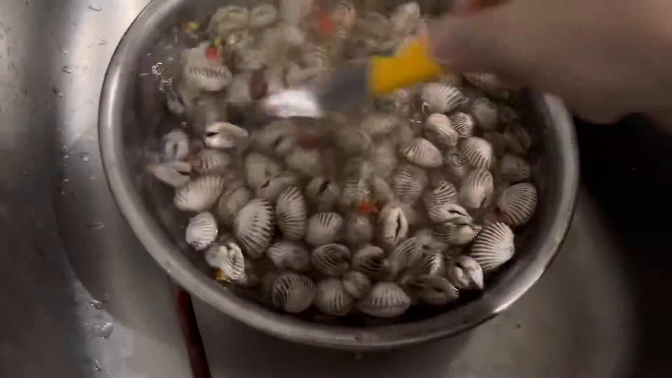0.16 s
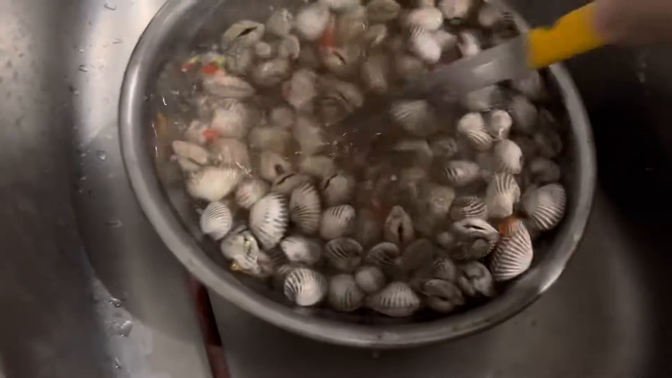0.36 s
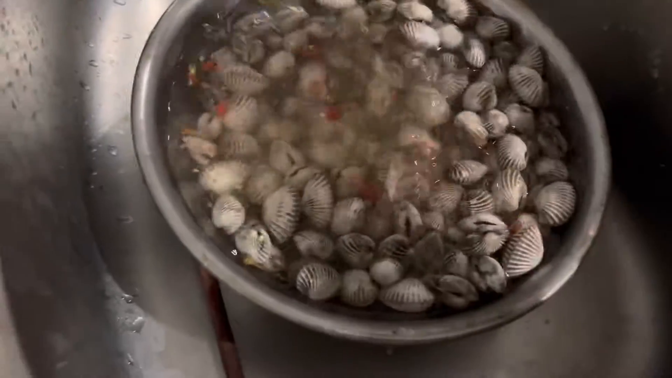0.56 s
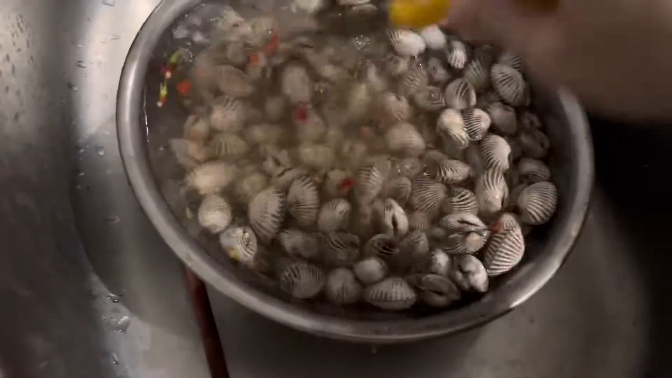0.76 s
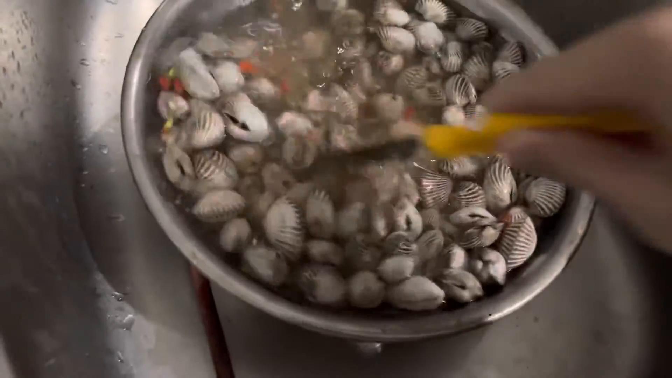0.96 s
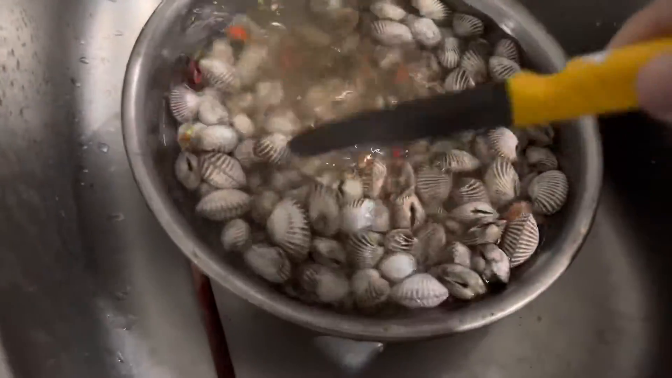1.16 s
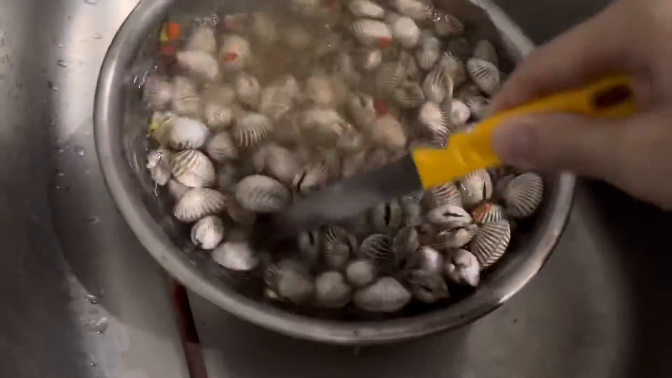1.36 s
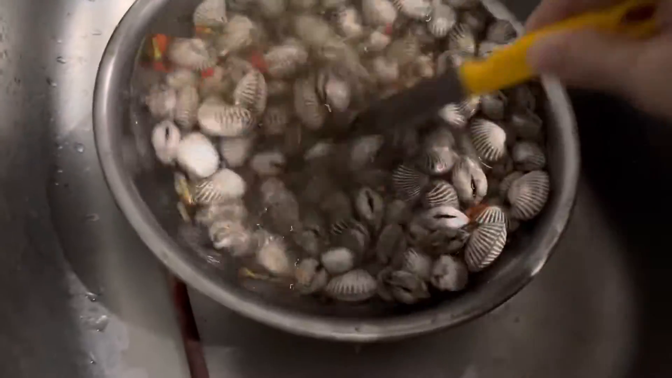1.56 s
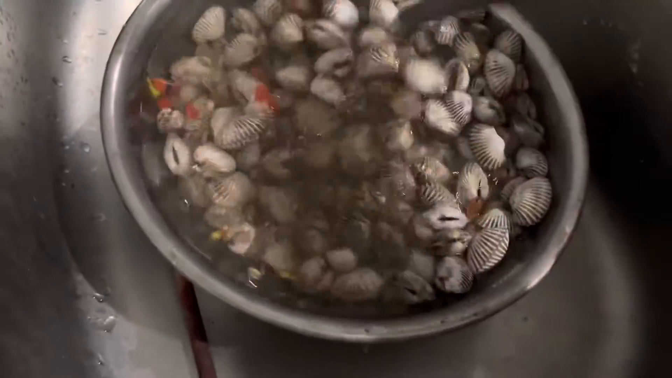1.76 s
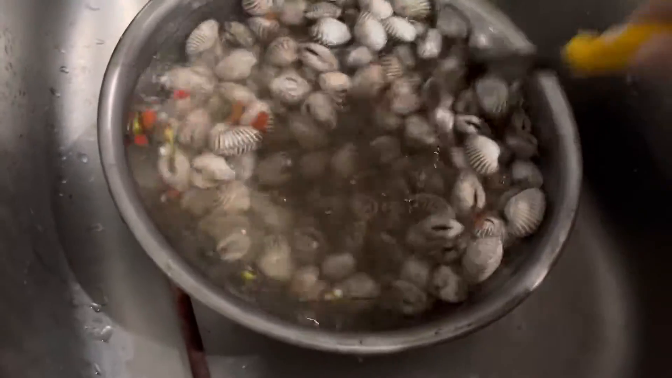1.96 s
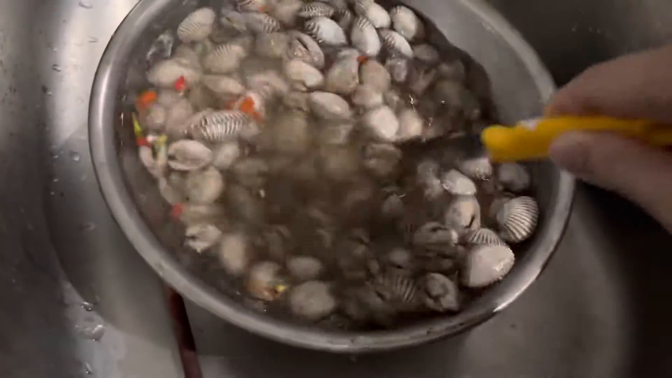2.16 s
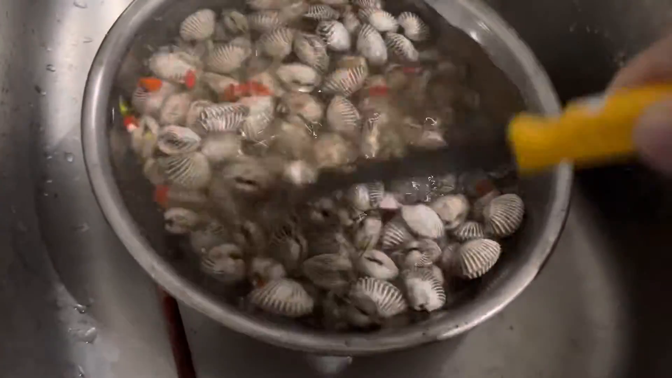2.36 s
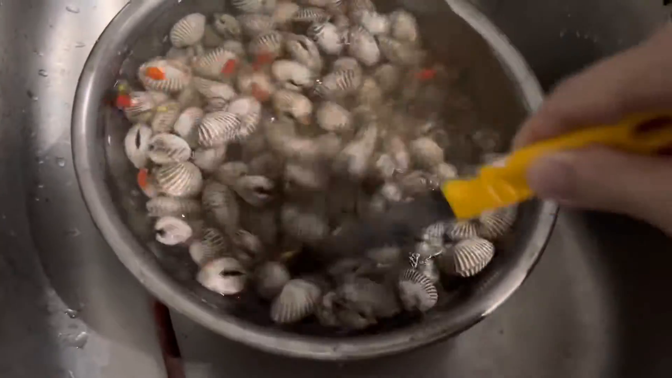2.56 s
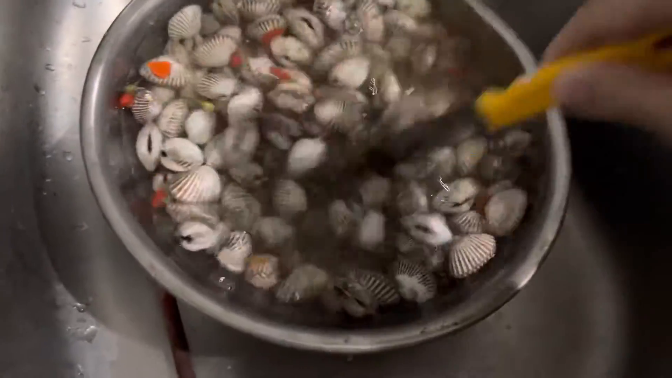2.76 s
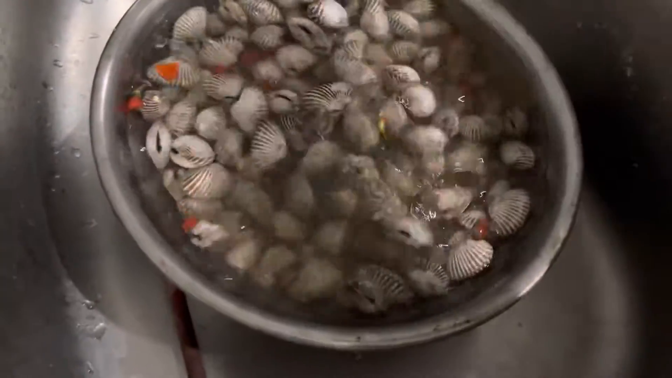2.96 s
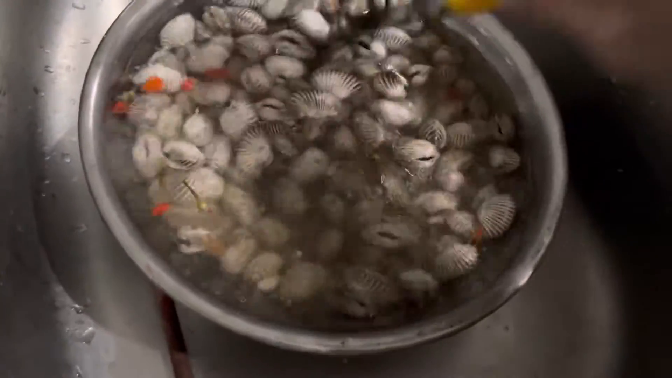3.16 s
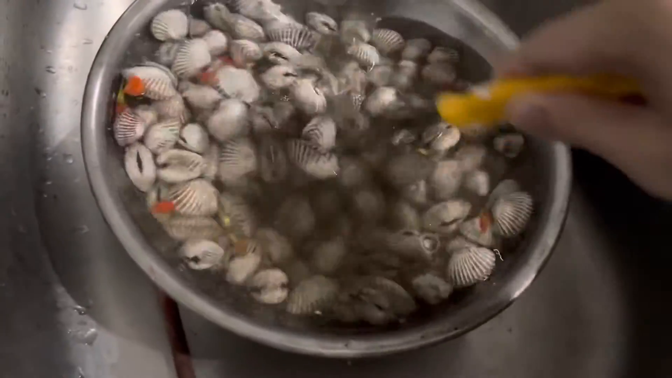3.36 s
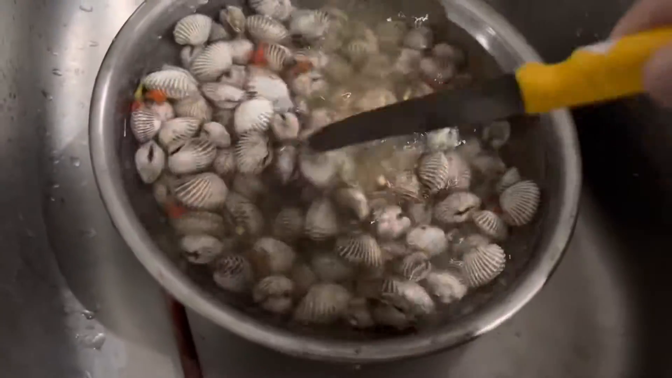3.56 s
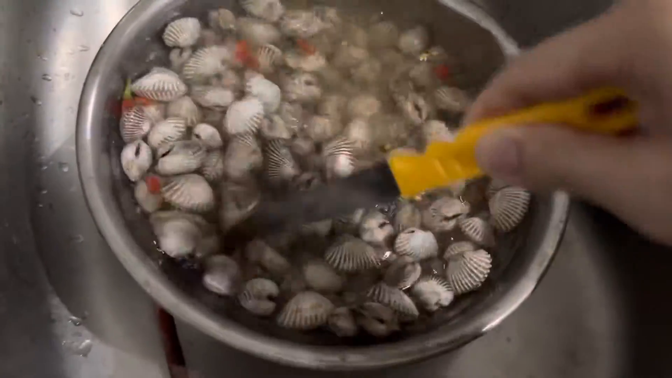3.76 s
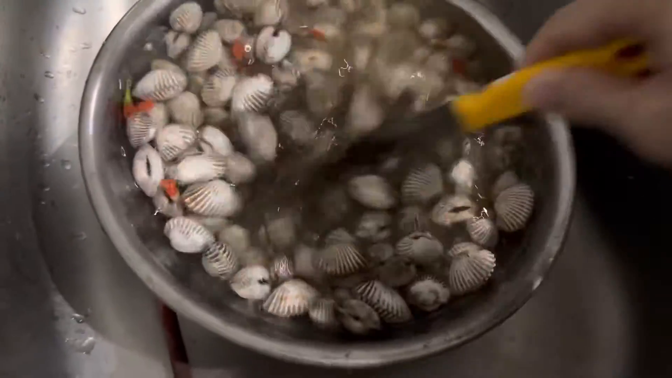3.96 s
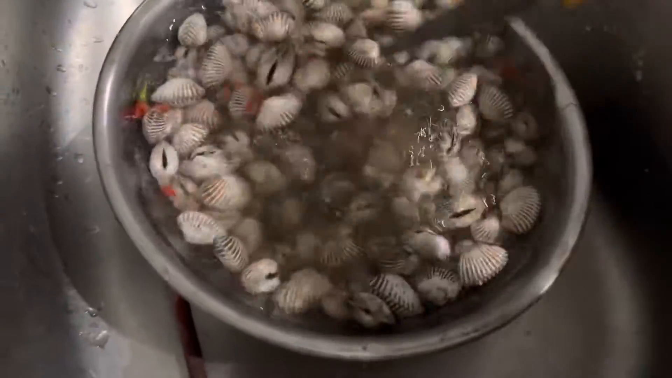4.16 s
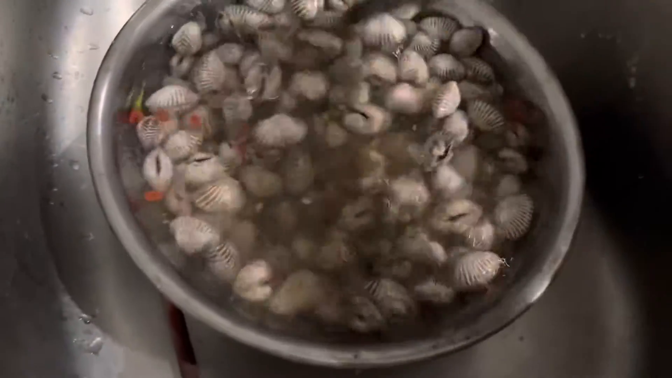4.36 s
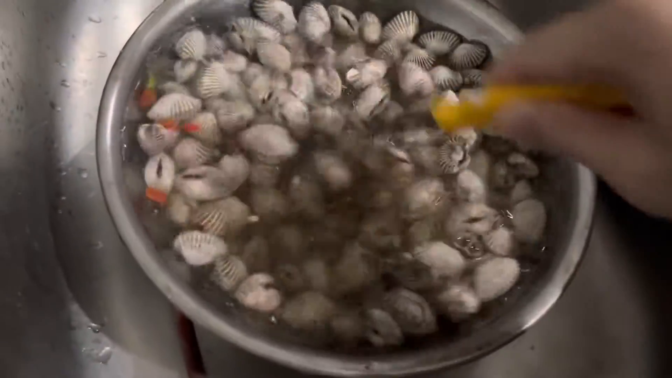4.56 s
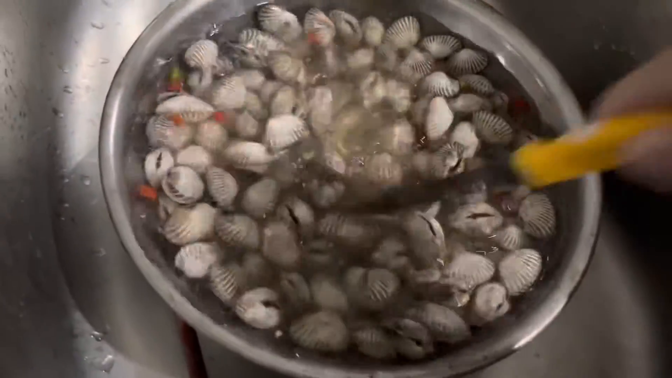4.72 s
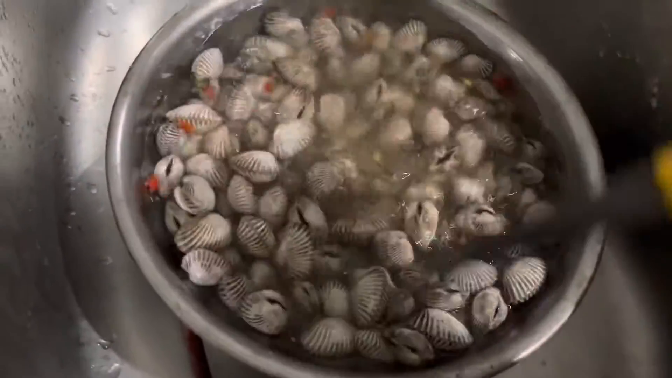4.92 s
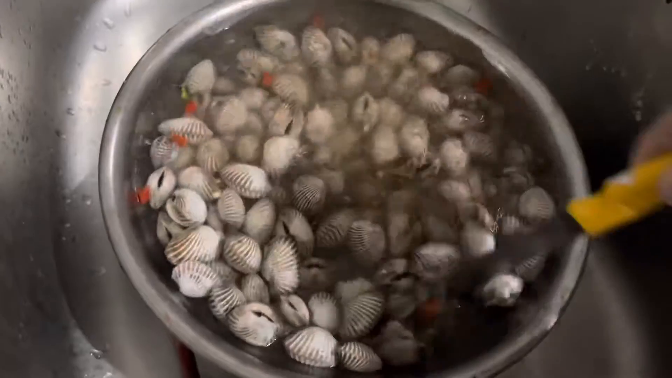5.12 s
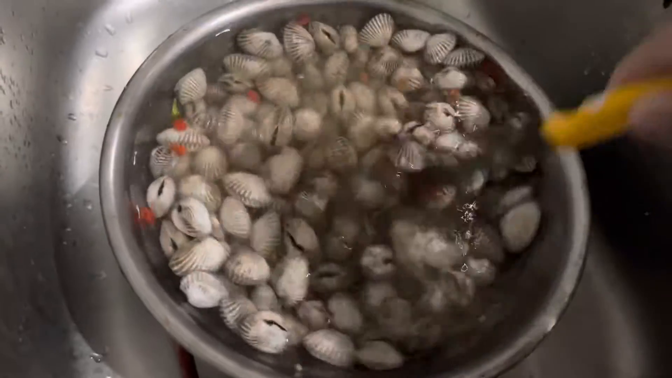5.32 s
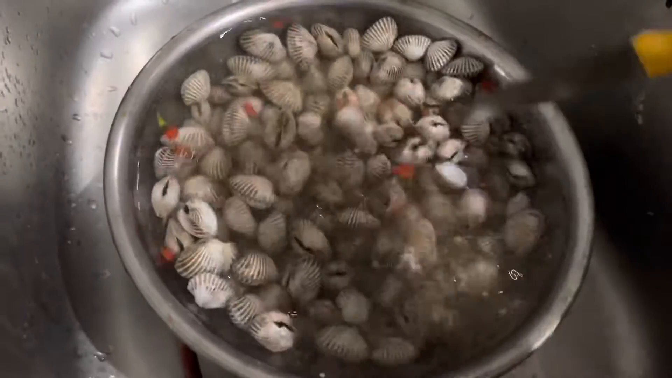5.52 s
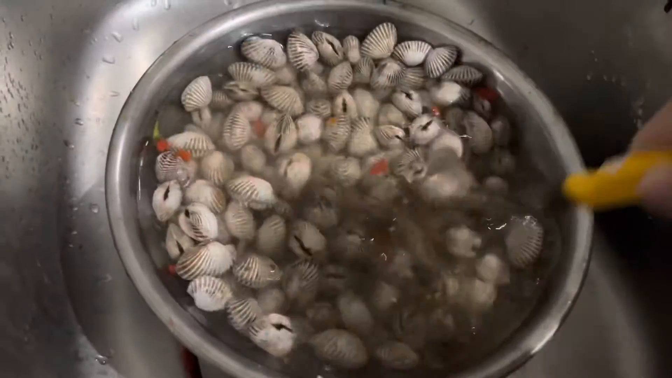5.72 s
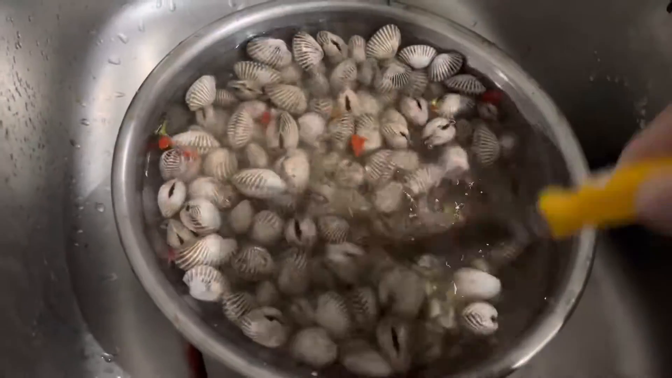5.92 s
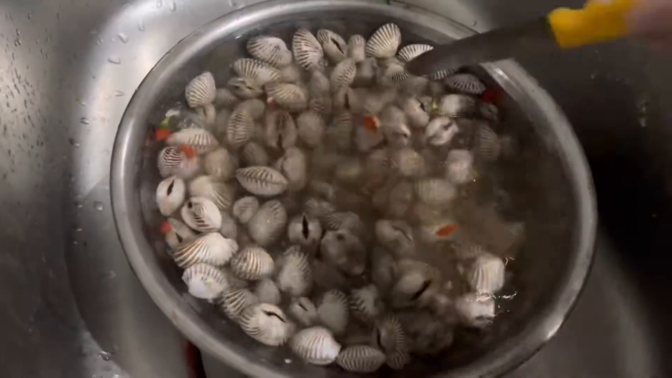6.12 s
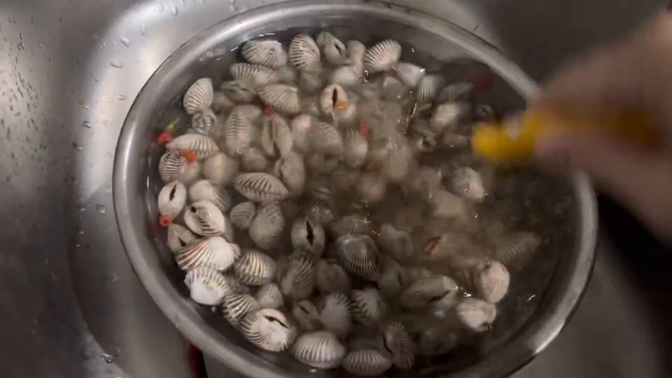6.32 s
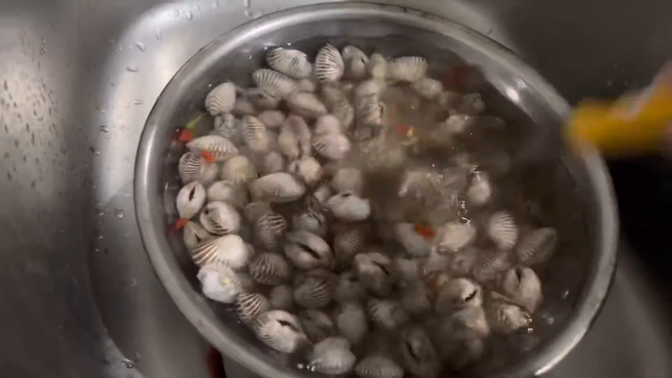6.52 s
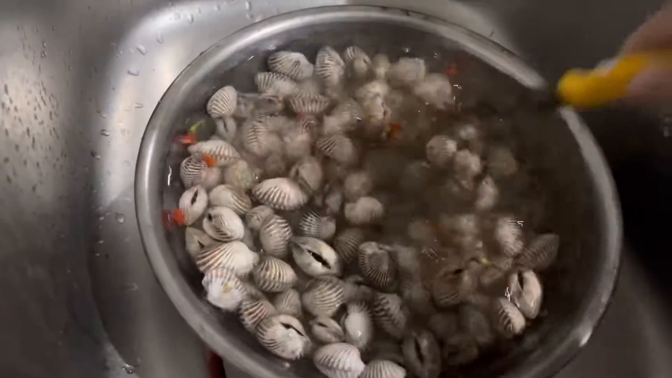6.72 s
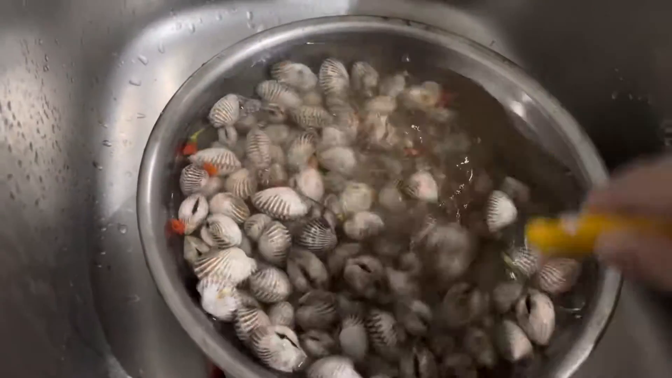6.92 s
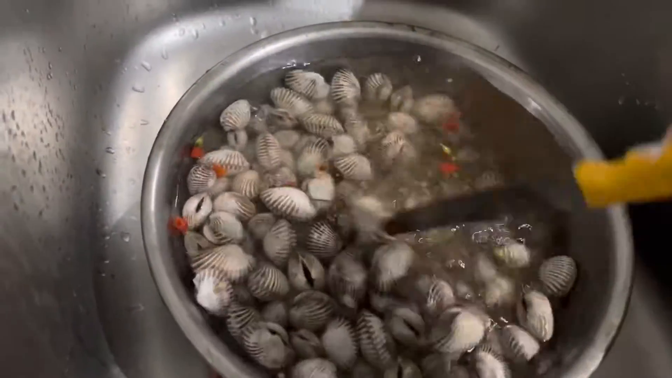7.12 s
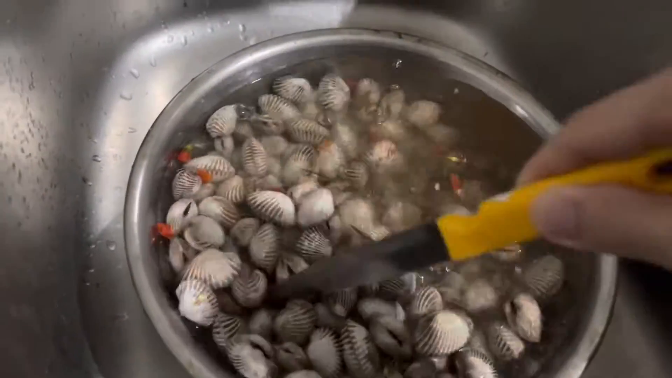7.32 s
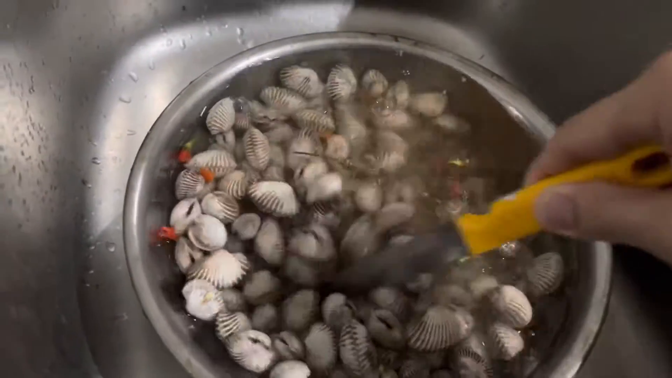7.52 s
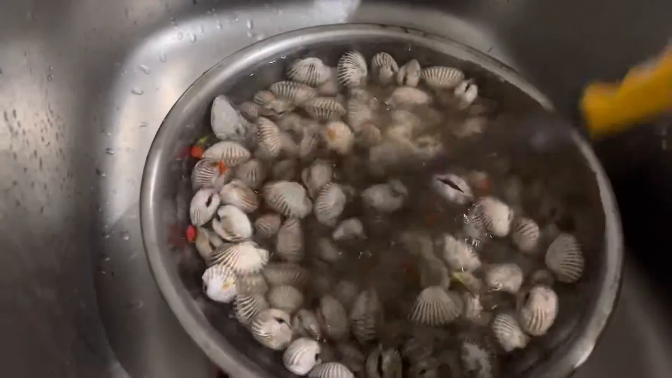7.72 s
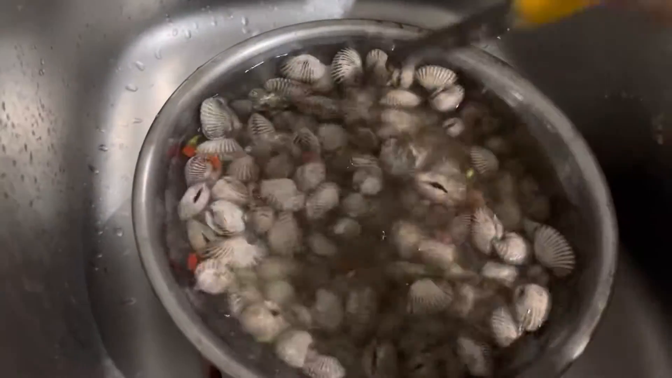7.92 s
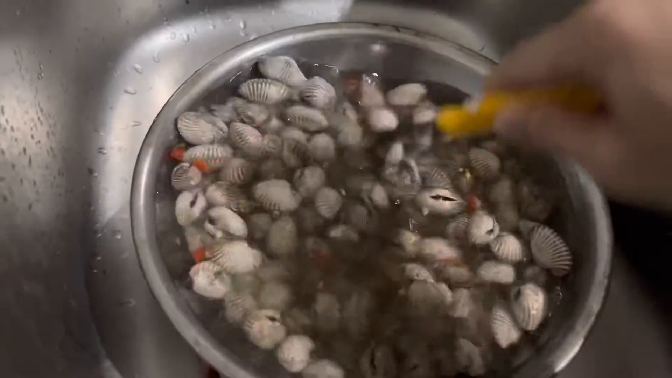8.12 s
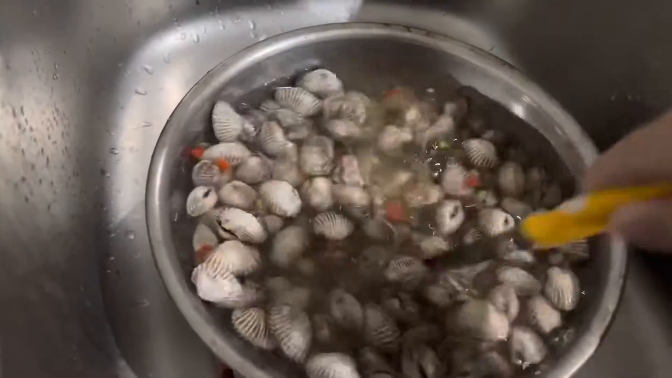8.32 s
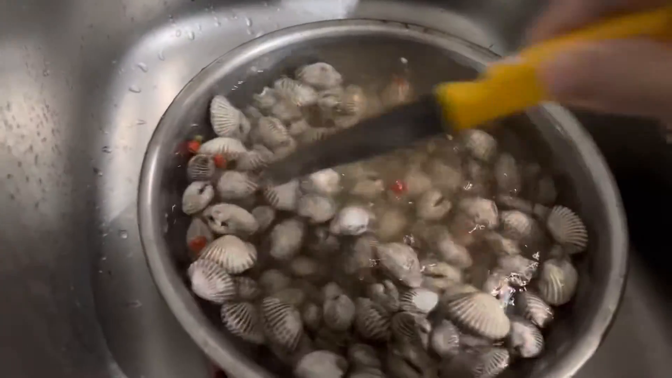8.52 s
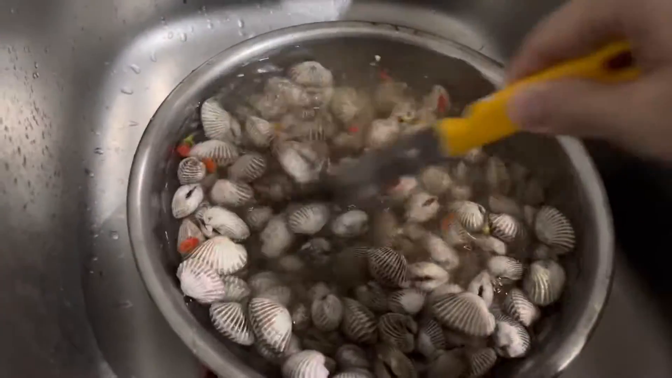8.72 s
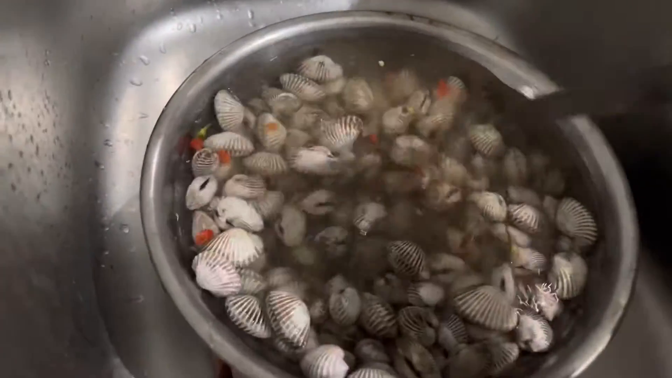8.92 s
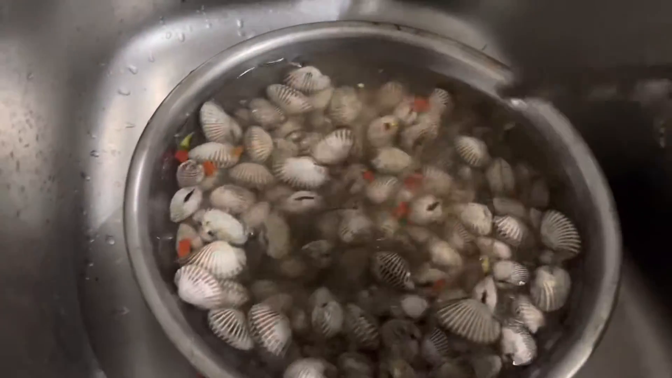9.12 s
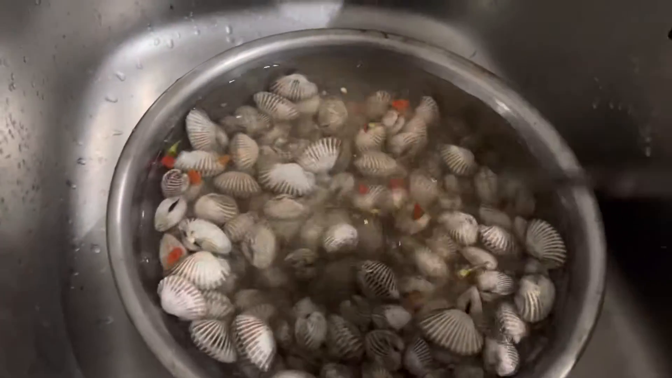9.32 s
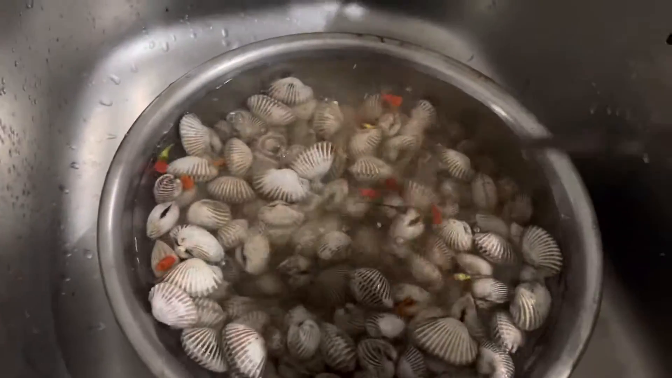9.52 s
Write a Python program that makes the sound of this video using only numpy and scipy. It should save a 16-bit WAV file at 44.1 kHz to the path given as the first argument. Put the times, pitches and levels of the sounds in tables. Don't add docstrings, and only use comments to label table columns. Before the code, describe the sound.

Close to a phone microphone in a small hard-walled kitchen, a knife stirs many small shells in a steel bowl of water set in a steel sink. The sound starts mid-stirring at 0 s with a sharp clack, then surges about every 0.6 s: blade strike, dense wet crunching rattle, dull water-damped bowl ring, brief fall. At 0.7 s a loud hollow gulp sags in pitch amid a heavy sink rumble. Strong strokes continue from 1.3 to 5 s, with ragged thuds on the bowl wall around 1.5, 4 and 4.6 s. The stroke near 5.7 s is somewhat lighter; then vigorous clattering returns from 6.2 s. At 8 s a low sink boom accompanies a hard stroke. A short, bright clatter at 8.6-8.8 s ends the stirring. After 9 s only tiny ticks remain over faint low hum and thin hiss.

```python
import sys
import numpy as np
from scipy import signal
from scipy.fft import rfft, irfft, next_fast_len
from scipy.io import wavfile
from scipy.ndimage import uniform_filter1d, map_coordinates

SR = 44100
rng = np.random.default_rng(int(sys.argv[2]) if len(sys.argv) > 2 else 0)


def waveform_to_disk(signal):
    frames = np.transpose(np.atleast_2d(signal))
    scaled = np.clip(frames, -1, 1) * 32767
    samples = np.round(scaled).astype(np.int16)
    wavfile.write(sys.argv[1], SR, samples)


def level_to_linear(level):
    exponent = np.asarray(level, float) / 20
    return 10 ** exponent


N = 426888

# (blade enters [s], build-up [s], hold [s], bowl ring on entry [dB], at full push [dB])
STROKE_TABLE = [(-0.5, .2, .02, -30, -24), (0.035, .24, .08, -30, -22), (0.71, .23, .03, -28, -22),
                (1.26, .215, .12, -28, -19.5), (1.931, .22, .05, -31, -23.5), (2.453, .21, .11, -37, -21.5),
                (3.09, .225, .11, -33, -19.5), (3.74, .22, .05, -28, -19), (4.373, .235, .02, -34, -20),
                (4.98, .2, .06, -37, -23.5), (5.645, .14, .21, -33, -28.5), (6.203, .12, .1, -32, -21),
                (6.75, .13, .09, -38, -19.5), (7.287, .3, .01, -34, -21), (7.976, .26, .03, -28, -19),
                (8.631, .065, .01, -35, -26), (8.93, .02, .08, -50, -50)]
# (time [s], peak [dB], pitch [Hz])
BLADE_STRIKES = [(0.0188, -19, 7840), (0.0516, -7, 3120), (0.6555, -18, 2870), (0.6973, -11, 2530),
                 (0.7166, -5, 2550), (1.2608, -12, 4330), (1.290, -10, 5000), (1.9302, -11, 7600),
                 (1.967, -18, 4300), (2.4542, -11.5, 2780), (2.4972, -20.5, 3840), (3.0895, -8.5, 2590),
                 (3.1192, -9, 3670), (3.167, -11, 4270), (3.7339, -14, 3800), (3.7594, -7.5, 2480),
                 (4.375, -8.5, 2950), (4.9773, -12, 6280), (5.013, -11, 8200), (5.1006, -13, 7200),
                 (5.646, -19.5, 3520), (6.2049, -7, 2990), (6.7447, -21, 3450), (6.7955, -6.5, 4580),
                 (7.2875, -12.5, 2920), (7.321, -17, 5240), (7.9826, -10.5, 4200), (8.017, -18, 3440),
                 (8.6312, -14, 7100), (8.6792, -12, 8400)]
# (time [s], peak [dB])
SINK_LURCHES = [(0.029, -36), (0.069, -28), (0.119, -26), (0.359, -30), (0.717, -23), (0.789, -20),
                (1.293, -31), (1.939, -32), (2.669, -34), (3.124, -24), (3.169, -26), (3.759, -27),
                (3.819, -25), (4.382, -28), (4.989, -41), (5.049, -37), (5.659, -31), (5.786, -29),
                (6.225, -23), (6.289, -27), (7.3, -31), (7.329, -31), (7.399, -29), (7.989, -17),
                (8.029, -19), (8.239, -30), (8.679, -40)]
# (frequency [Hz], width [Hz], level [dB])
BOWL_MODES = [(220, 22, -7.5), (312.5, 23, -2), (419.4, 55, -3), (483.5, 47, 0), (538, 32, 3),
              (681, 50, -5), (766, 40, -4.5), (856, 52, -3.5), (995, 56, -0.5), (1069, 120, -5),
              (1205, 110, -6), (1307, 120, -8.5), (1465, 53, -5), (1678, 57, -3), (1830, 99, -9.5),
              (2120, 250, -15.5), (2570, 120, -11), (2930, 150, -11.5), (3980, 170, -22)]
# (frequency [Hz], width [Hz], level [dB])
SINK_MODES = [(65, 13, 1), (105, 23, -3.5), (138, 42, -5)]
# (frequency [Hz], density [dB per Hz])
SHELL_SPECTRUM = [(300, -36), (900, -20), (1900, -9.5), (3000, -4.5), (4400, -2.5), (6000, -6), (8500, -4),
                  (10000, -7.5), (12000, -9), (15500, -17.5), (16500, -56)]


def unit(x):
    return x / np.sqrt(np.mean(x ** 2) + 1e-20)


def along(points, hz):
    f, v = np.transpose(points)
    return np.interp(np.log(hz + 1), np.log(f + 1), v)


def wobble(rate_hz):
    step = 16
    knots = rng.standard_normal(int(N * 400 / SR) + 9)
    curve = map_coordinates(knots, [np.arange(0, N, step) * min(rate_hz, 399) / SR])
    return np.repeat(curve, step)[:N]


def filtered(x, response):
    m = next_fast_len(N + SR // 2)
    return irfft(rfft(x, m) * response(np.fft.rfftfreq(m, 1 / SR)), m)[..., :N]


def modes(table):
    def response(f):
        total = 0
        for k, (centre, width, db) in enumerate(table):
            band = 1j * f * width
            total = total + (-1) ** k * level_to_linear(db) * band / (centre * centre - f * f + band)
        return total
    return response


def sink_response(low_cut_hz):
    return lambda hz: modes(SINK_MODES)(hz) * hz ** 4 / (hz ** 4 + low_cut_hz ** 4)


def shell_colour(gain_db=0):
    return lambda hz: level_to_linear(along(SHELL_SPECTRUM, hz) + gain_db)


def high_shelf(hz, order):
    return lambda f: 1 / (1 + (hz / (f + 1)) ** order)


def contacts(per_second, spread_db):
    count, hits = int(per_second * N / SR), np.zeros((2, N))
    size = level_to_linear(spread_db * np.minimum(rng.exponential(1, count), 3))
    hits[:, rng.integers(0, N, count)] = size * rng.standard_normal((2, count))
    return hits


def kitchen():
    # (frequency [Hz], density [dB per Hz])
    hum_spectrum = [(15, -43.5), (27, -28), (42, -6), (82, -10.5), (99, -11), (137, -16), (212, -34.5),
                    (607, -47), (2480, -49.5), (4740, -60.5), (7110, -43), (10100, -87), (16000, -115)]
    # (frequency [Hz], width [Hz], level [dB])
    hiss_modes = [(2400, 900, -8.5), (6400, 900, -2), (7150, 250, 3.5)]
    hum = unit(filtered(rng.standard_normal((2, N)), lambda hz: level_to_linear(along(hum_spectrum, hz))))
    hiss = unit(filtered(rng.standard_normal((2, N)), lambda hz: modes(hiss_modes)(hz) ** 2))
    return level_to_linear(-54.5) * hum + level_to_linear(-71) * hiss


def settle(rise_s, hold_s):
    return 53 + 3.2 / (rise_s + hold_s)


def ring_level(t):
    entry_s, touch_db, sag_db_per_s, still_db = .035, -8, 20, -77
    power = level_to_linear(2 * still_db)
    for s, rise, hold, entry_db, full_db in STROKE_TABLE:
        times = s + np.cumsum([0, min(entry_s, rise / 2), max(rise - entry_s, rise / 2), hold, 1])
        held_db = full_db - sag_db_per_s * hold
        levels = [entry_db + touch_db, entry_db, full_db, held_db, held_db - settle(rise, hold)]
        power = power + level_to_linear(2 * np.interp(t, times, levels, -120, -120))
    return 10 * np.log10(power)


def stroke_levels():
    # (time [s], shell rattle [dB], time to lose 20 dB [s], sharpness [dB])
    digs = [(0.019, -37, 3, -12), (0.075, -25.5, 1.6, -10), (0.48, -43, .4, -24), (0.655, -30, .03, -11),
            (0.715, -25, 1.2, -10), (1.26, -37, .1, -3), (1.287, -29, .4, -10), (1.931, -25, 1.2, -11),
            (2.453, -32, .15, -10), (2.525, -26, .8, -10), (2.9, -34, .5, -10), (3.09, -36, .1, -2),
            (3.125, -28, .25, -10), (3.62, -56, .9, 0), (3.76, -22, .1, -11), (4.2, -41, .4, -12),
            (4.373, -29, .6, -11), (4.977, -40, .6, -11), (5.055, -24, .9, -15), (5.44, -45, .7, -11),
            (5.646, -28, 1.1, -13), (6.0, -41, .35, -24), (6.203, -29, .1, -8), (6.26, -26, .7, -9),
            (6.744, -32, .3, -12), (6.795, -30, .4, -11), (7.318, -31, .3, -13), (7.982, -23, .1, -11),
            (8.03, -26, .8, -11), (8.631, -35, .7, -4)]
    rattle_db, rattle_grows, shake_db, shake_grows = -23.5, 1.35, -41.5, .55
    sharp_db, sharp_grows = -10, .45
    dry_db, dry_s = 9, .025
    slide_s = .035
    sink_rest_db, lurch_hum_db = -52, -9
    step = 16
    t = np.arange(0, N + step, step) / SR
    bowl_db = ring_level(t)
    over_db = bowl_db + 20
    rattle = level_to_linear(2 * (rattle_db + rattle_grows * over_db))
    edge = rattle * level_to_linear(2 * (sharp_db + sharp_grows * over_db))
    sink = level_to_linear(2 * (shake_db + shake_grows * over_db)) + level_to_linear(2 * sink_rest_db)
    for s, dig_db, fall_s, dig_sharp_db in digs:
        rise, hold, stop = next((b, h, a + b + h) for a, b, h, *_ in STROKE_TABLE if a + b + h > s)
        since = np.maximum(t - s, 0)
        struck = min(abs(s - row[0]) for row in BLADE_STRIKES) < .009
        swell = 1 if struck else np.minimum(since / slide_s, 1) ** 2
        rest_db = rattle_grows * settle(rise, hold) * np.maximum(t - stop, 0)
        burst = (t >= s) * swell * level_to_linear(2 * (dig_db - 20 * since / fall_s - rest_db))
        rattle = rattle + burst
        edge = edge + burst * level_to_linear(2 * (dig_sharp_db + dry_db * np.exp(-since / dry_s)))
    for s, db in SINK_LURCHES:
        sink = sink + (t >= s) * level_to_linear(2 * (db + lurch_hum_db - 130 * np.maximum(t - s, 0)))
    levels = 10 * np.log10(rattle), bowl_db, 10 * np.log10(sink), 10 * np.log10(edge / rattle)
    return [np.repeat(level, step)[:N] for level in levels]


def patchy(x, depth_db):
    z = signal.stft(x, nperseg=256)[2]
    field = uniform_filter1d(rng.standard_normal(z.shape[1:]), size=7, axis=0)
    field = uniform_filter1d(field, size=8, axis=1)
    return signal.istft(z * level_to_linear(depth_db * unit(field)), nperseg=256)[1][:, :N]


def rattle(clumps, sharp_db):
    count, t = 22000, np.arange(130) / SR
    when, pitch, size, life = rng.random((count, 4)).T[..., None]
    hz = 1700 + 8500 * pitch
    decay_db = -60 * t * hz / (10 + 30 * life)
    click = level_to_linear(-1.8 * np.log(size + .08) + decay_db) * np.sin(2 * np.pi * hz * t)
    at = (when * N + np.arange(len(t))).astype(int).ravel()
    sides = rng.uniform(-1, 1, (2, count, 1))
    clicks = np.array([np.bincount(at, (side * click).ravel(), N)[:N] for side in sides])
    t = np.arange(SR // 40) / SR
    scrape = rng.standard_normal((2, len(t))) * level_to_linear(-60 * t / 0.014)
    grit = signal.oaconvolve(contacts(1500, spread_db=2.2), scrape, axes=1)[:, :N]
    heap = 0.65 * unit(clicks) + 0.6 * unit(grit) + 0.85 * rng.standard_normal((2, N))
    heap = unit(clumps * filtered(patchy(heap, depth_db=2.0), shell_colour()))
    edge = filtered(heap, high_shelf(7500, 8))
    return heap + (level_to_linear(sharp_db + 6.5) - 1) * edge


def stirring():
    # (time [s], level [dB])
    upper = [(0.3, -0.5), (0.95, 2), (1.5, 0), (2.15, 1), (2.7, 0), (3.35, 0), (3.97, 0), (4.6, 0),
             (5.2, 0), (5.85, 0), (6.37, 0), (6.93, 0), (7.57, 2), (8.25, 0.5), (8.7, 0), (8.95, -4)]
    rattle_db, bowl_db, sink_db, sharp_db = stroke_levels()
    surge = 1.1 * wobble(25) + 0.81 * wobble(60)
    push = unit(contacts(1500, spread_db=2.0)) + 0.81 * rng.standard_normal((2, N))
    drive = level_to_linear(0.36 * surge + 0.73 * wobble(35) + 0.9 * wobble(12)) * push
    bowl = unit(filtered(drive, modes(BOWL_MODES)))
    rim = filtered(bowl, high_shelf(800, 4))
    rim_db = 0.34 * (bowl_db + 28.5) + np.interp(np.arange(N) / SR, *np.transpose(upper))
    bowl = bowl + (level_to_linear(rim_db) - 1) * rim
    sink = unit(filtered(level_to_linear(0.84 * wobble(19)) * rng.standard_normal((2, N)), sink_response(40)))
    shells = rattle(level_to_linear(surge + 1.1 * wobble(150)), sharp_db)
    return level_to_linear(rattle_db + 1.72) * shells + level_to_linear(bowl_db + 1.54) * bowl + level_to_linear(sink_db + 1.2) * sink


def knocks():
    # (time [s], peak [dB], pitch [Hz], bowl blow [dB])
    clacks = [(0.1244, -9, 4300, -22), (2.47, -21, 2900, -20), (2.599, -7.5, 4550, -9),
              (2.807, -15.5, 3000, -8), (4.145, -14, 2530, 4), (4.4784, -14.5, 2920, 1),
              (4.572, -9, 4800, -3), (4.6701, -2.5, 2900, -5), (5.0619, -24, 7170, -5),
              (5.0855, -18.5, 2570, -15), (5.3312, -9, 4420, -11), (5.8484, -8, 3750, -6),
              (6.264, -11, 4250, -10), (6.2947, -6, 2800, -11), (6.3583, -5, 5050, 6),
              (6.9835, -5, 4020, -4), (7.5364, -9, 2260, -13), (8.6647, -28, 2870, -15.5),
              (8.7255, -11.5, 7640, -0.5), (8.7444, -16.5, 5630, -17)]
    # (time [s], peak [dB], pitch [Hz], bowl blow [dB])
    settling = [(0.5486, -22, 3130, 0), (0.6, -20, 3260, -6), (2.9527, -17, 2020, 2),
                (3.0294, -30, 4360, -20), (3.068, -28, 3000, -17), (3.533, -31, 2900, -7),
                (4.1081, -24.5, 3890, -6), (4.3155, -16, 2980, -3), (5.4468, -20, 2880, 5),
                (5.4959, -22, 3800, 3), (6.0247, -17, 2710, -15), (6.117, -23, 4500, -5),
                (6.17, -30, 8450, 8), (6.7062, -28, 3030, -3), (7.2115, -19.5, 7950, -4),
                (7.7932, -15, 2060, 2), (7.9214, -28, 5200, -8), (8.7644, -24.5, 2860, -20),
                (8.9341, -30, 2980, 6), (9.2665, -54, 4800, 17), (1.135, -30, 3000, 8), (4.2, -26, 3500, 0),
                (6.58, -26, 3000, 2)]
    blade_blow_db, soft_hz = -11, 750
    crack, ring, blows = np.zeros((2, N + SR)), np.zeros((2, N + SR)), np.zeros((2, N))
    t = np.arange(SR // 12) / SR
    rise = 1 - np.exp(-t * 4000)
    strikes = [(*row, blade_blow_db) for row in BLADE_STRIKES]
    for s, db, hz, blow_db in [*strikes, *clacks, *settling]:
        at = round(s * SR)
        span = slice(at, at + len(t))
        luck = rise * rng.standard_normal((3, 2, len(t)))
        crack[:, span] += level_to_linear(db - 9) * (level_to_linear(-60 * t / .008) + .5 * level_to_linear(-60 * t / 0.039)) * luck[0]
        shell = signal.iirpeak(hz, 2.2, SR)
        ring[:, span] += signal.lfilter(*shell, level_to_linear(db - 4 - 60 * t / 0.035) * luck[1])
        blows[:, span] += level_to_linear(db + blow_db + 7.5 - 60 * t / .03) * luck[2]
    soft = level_to_linear(5) * signal.lfilter(*signal.butter(2, soft_hz, fs=SR), blows)
    bowl = filtered(soft + thuds(), modes(BOWL_MODES))
    return filtered(crack[:, :N], shell_colour(4)) + ring[:, :N] + bowl


def echoes(x):
    # (frequency [Hz], t60 [s])
    room_t60 = [(200, 0.24), (2000, 0.36), (9000, 0.05)]
    hz, t, z = signal.stft(rng.standard_normal((2, SR // 3)), SR, nperseg=256)
    fade = level_to_linear(-60 * t / along(room_t60, hz)[:, None])
    tail = signal.istft(z * fade, SR, nperseg=256)[1]
    late = np.pad(x, ((0, 0), (200, 0)))
    return signal.fftconvolve(late, tail / np.linalg.norm(tail[0]), axes=1)[:, :N]


def lurches():
    push_s = .007
    t, out = np.arange(N) / SR, np.zeros((2, N))
    push = np.sin(np.pi * np.minimum(t / push_s, 1))
    boom = filtered(push, sink_response(36))[:SR // 3]
    for s, db in SINK_LURCHES:
        out[0, round(s * SR):][:len(boom)] += level_to_linear(db + .5) * boom / abs(boom).max()
    return out


def pings():
    # (time [s], peak [dB], pitch [Hz], t60 [s])
    edge_hits = [(0.1052, -17, 3010, .012), (0.1371, -11, 4260, .012), (0.222, -17, 6500, .01),
                 (0.408, -21, 7000, .01), (1.4391, -15, 2900, .012), (2.5571, -19, 3910, .015),
                 (3.2266, -19, 3520, .012), (3.8806, -19, 3800, .012), (5.1003, -9, 7200, .02),
                 (5.178, -15, 5000, .015), (5.7164, -20, 3340, .012), (6.8853, -15, 2990, .012),
                 (6.9292, -14, 2830, .012), (7.3417, -20, 2580, .012), (8.0835, -14, 4140, .012),
                 (8.6787, -7, 7500, .006), (8.692, -15, 7000, .01), (8.7435, -14, 6000, .006),
                 (8.764, -20, 6000, .01), (8.787, -24, 6500, .01), (8.936, -27, 600, .07),
                 (9.07, -57, 5000, .006), (9.1805, -52, 3700, .014), (9.2665, -46, 5000, .007),
                 (9.2775, -50, 3900, .008), (9.3028, -51, 3200, .012), (9.419, -52, 3300, .02)]
    out, t = np.zeros((2, N + SR)), np.arange(SR // 20) / SR
    for s, db, hz, t60 in edge_hits:
        size, detune = rng.standard_normal((2, 2, 9, 1))
        partials = size * np.sin(2 * np.pi * hz * np.exp(0.21 * detune[0]) * t)
        ring = level_to_linear(-60 * t / t60) * np.sum(partials, axis=1)
        out[:, round(s * SR):][:, :len(t)] += level_to_linear(db) * ring / abs(ring).max()
    return out[:, :N]


def thuds():
    # (time [s], peak [dB])
    wall_hits = [(0.296, 2), (0.838, -11), (0.922, -4), (1.342, -11.5), (1.4, -6.5), (1.479, 1.5),
                 (1.938, -6), (2.75, -11), (3.317, -3), (3.402, -9.5), (3.758, -13.5), (3.87, -13),
                 (3.892, -9.5), (3.938, -8), (3.961, 3), (4.583, 1), (4.606, -0.5), (5.79, -5),
                 (6.302, -12), (6.366, -8), (6.885, -9.5), (6.926, -3.5), (6.981, -3.5), (7.528, -3),
                 (7.565, 1), (7.983, -10), (8.222, -14), (8.243, -10), (8.266, -5.5), (8.319, -5),
                 (0.232, -8), (2.012, -12), (3.262, -10), (3.823, -10), (4.033, -8), (5.129, -10),
                 (5.17, -6), (7.076, -12), (7.469, -11), (8.084, -8), (8.16, -8), (8.184, -6), (8.397, -12),
                 (8.694, -12), (2.15, -8), (2.215, -8), (6.335, -6), (6.41, -8), (2.6, -8), (2.7, -8)]
    blows, t = np.zeros((2, N + SR)), np.arange(SR // 20) / SR
    rise = 1 - np.exp(-t / 0.0051)
    for s, db in wall_hits:
        push = level_to_linear(db + 7 - 60 * t / 0.049) * rise * rng.standard_normal((2, len(t)))
        blows[:, round(s * SR):][:, :len(t)] += push
    return blows[:, :N]


def gulps():
    # (time [s], peak [dB], pitch [Hz])
    pockets = [
        (0.713, -8, 423),
        (6.234, -26, 431),
    ]
    out, t = np.zeros((2, N + SR)), np.arange(SR // 6) / SR
    sag = np.cumsum(.72 + 0.4 * np.exp(-t / 0.036)) / SR
    flutter_db = 4 * wobble(90)[:len(t)]
    fade = level_to_linear(-60 * t / 0.07) + 0.22 * level_to_linear(-60 * t / 0.7)
    rise = 1 - np.exp(-t / 0.007)
    for s, db, hz in pockets:
        tone = np.sin(2 * np.pi * hz * sag)
        out[0, round(s * SR):][:len(t)] += level_to_linear(db + flutter_db) * fade * rise * tone
    return out[:, :N]


def scene():
    hits = knocks() + gulps()
    return stirring() + pings() + hits + level_to_linear(-4.5) * echoes(hits) + lurches() + kitchen()


def sudden(x, jump_db):
    power = np.add.reduceat(np.diff(x) ** 2, np.arange(0, N - 1, 128)) + 1e-12
    leap = power[6:] / uniform_filter1d(power, size=6)[2:-4] > level_to_linear(2 * jump_db)
    return np.add.reduceat(np.pad(leap, (10, 16)), np.arange(0, len(leap) + 18, 8)) > 0


def thinned(ports, weaker_db, masked_db, ragged_db):
    halves = np.array([ports[0] + ports[1], ports[0] - ports[1]]) / 2
    hz, _, z = signal.stft(halves, SR, "cosine", 2048, 1024)
    bands = np.add.reduceat(abs(z) ** 2, np.arange(0, len(hz), 16), axis=1)
    power = np.repeat(bands, 16, axis=1)[:, :len(hz)]
    body = power[0, (hz > 1000) & (hz < 8000)].mean(axis=0)
    mood_db = np.repeat(ragged_db * rng.standard_normal(bands.shape), 16, axis=1)[:, :len(hz)]
    strong = power > level_to_linear(2 * (weaker_db + mood_db)) * power.sum(axis=0)
    audible = power > level_to_linear(2 * (masked_db + mood_db)) * body
    low = (hz < 8300)[:, None]
    keep = (strong & audible) | low | sudden(ports[0], jump_db=7)[:z.shape[-1]]
    mid, side = signal.istft(z * keep, SR, "cosine", 2048, 1024)[1][:, :N]
    return np.array([mid + side, mid - side])


def top_cut(x):
    return signal.sosfilt(signal.butter(12, 17000, fs=SR, output="sos"), x)


def record(dry):
    # (frequency [Hz], correlation [0-1])
    alike = [(60, .99), (130, .95), (290, .9), (640, .7), (1410, .68), (3100, .56), (6800, .62),
             (7800, .85), (8400, .92)]
    # (frequency [Hz], level [dB])
    lean = [(60, .3), (380, 0), (700, 3.5), (1290, 2.5), (4400, 3), (7000, 2), (8400, 0)]
    # (frequency [Hz], left lead
    phase_lead = [(500, 0), (700, .06), (1900, -.25), (2800, .2), (7500, .1), (8600, 0), (10150, -1), (11900, -2),
                  (13800, -3), (15500, -4)]

    def spread(hz):
        turn = np.arccos(np.clip(along(alike, hz), 0, 1)) / 2
        return np.array([np.cos(turn), np.sin(turn)])

    def port(hz):
        left = level_to_linear(along(lean, hz) / 2) * np.exp(.5j * np.pi * along(phase_lead, hz))
        return left ** np.array([[1], [-1]]) * (hz < 16500)

    shared, apart = filtered(dry, spread)
    ports = filtered(np.array([shared + apart, shared - apart]), port)
    ports = ports / (1 + abs(ports / .95) ** 4) ** (1 / 4)
    mix = thinned(ports, weaker_db=-4.5, masked_db=-24.5, ragged_db=2.5)
    return top_cut(mix)


dry = scene()
out = record(dry)
waveform_to_disk(out)
```